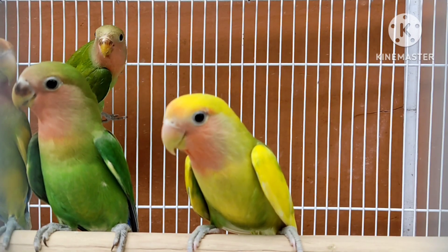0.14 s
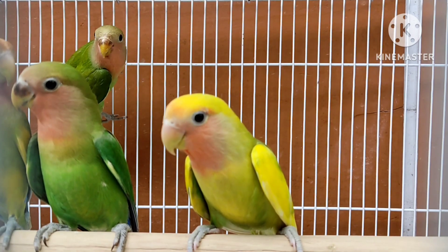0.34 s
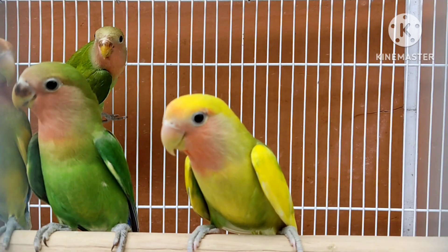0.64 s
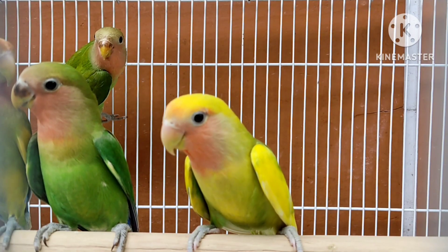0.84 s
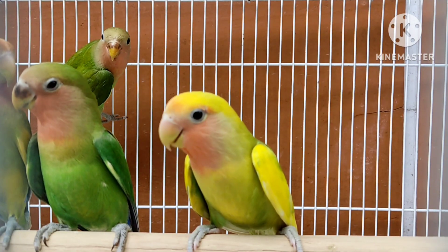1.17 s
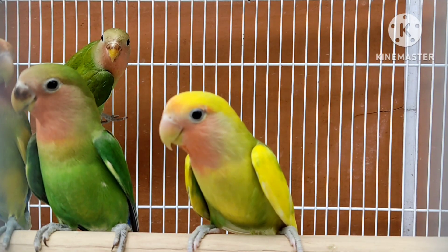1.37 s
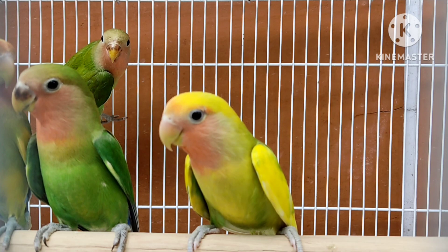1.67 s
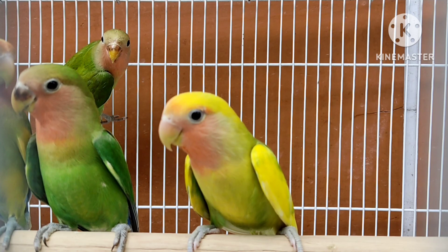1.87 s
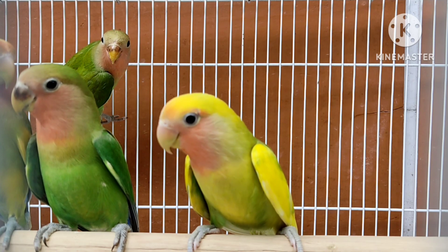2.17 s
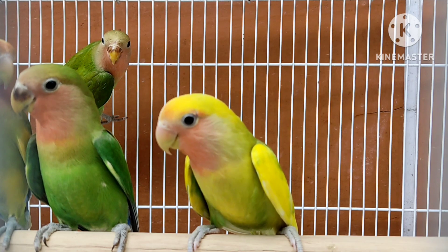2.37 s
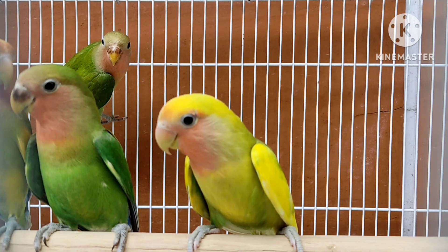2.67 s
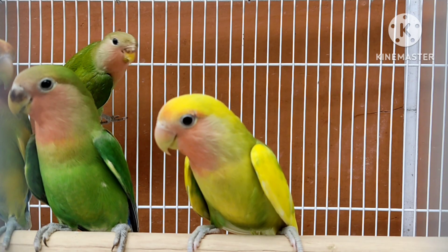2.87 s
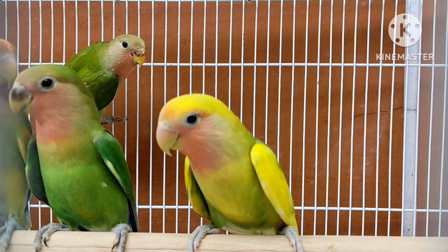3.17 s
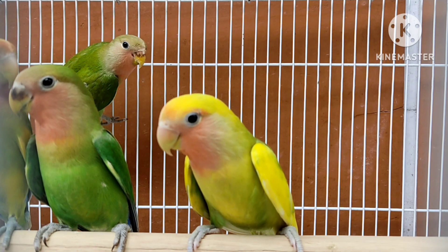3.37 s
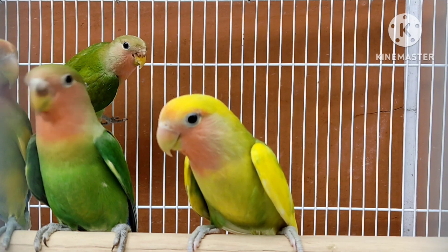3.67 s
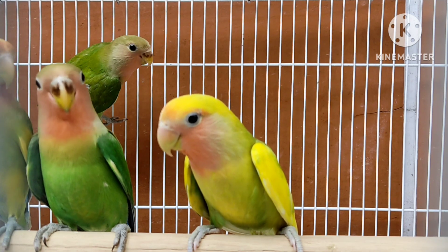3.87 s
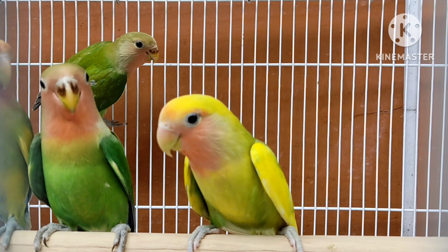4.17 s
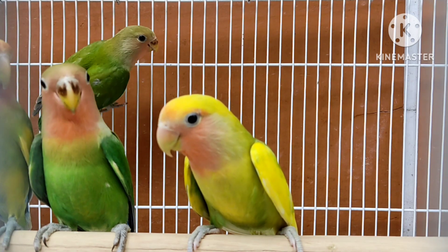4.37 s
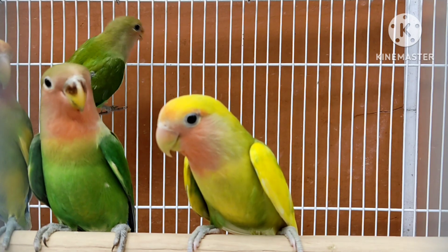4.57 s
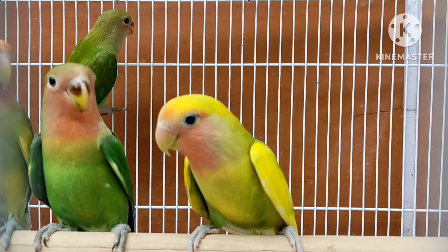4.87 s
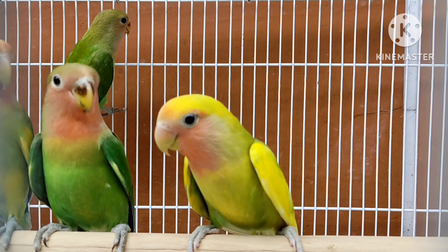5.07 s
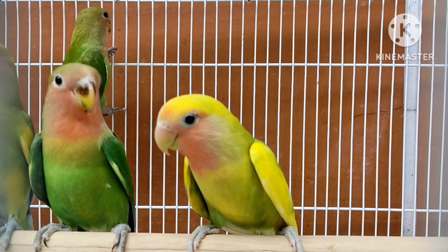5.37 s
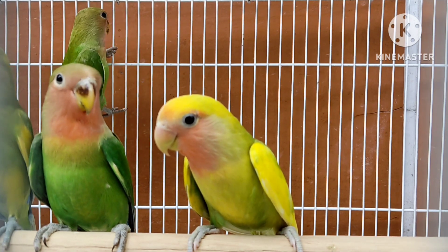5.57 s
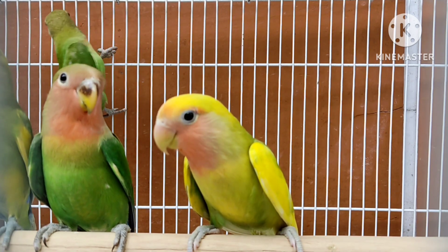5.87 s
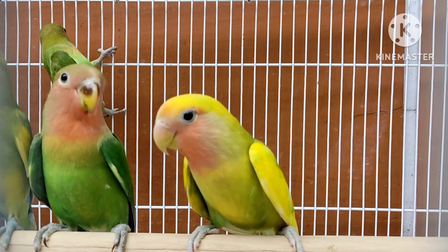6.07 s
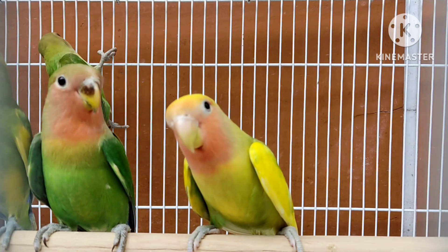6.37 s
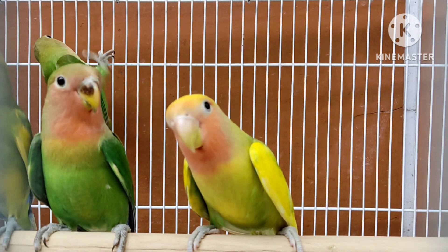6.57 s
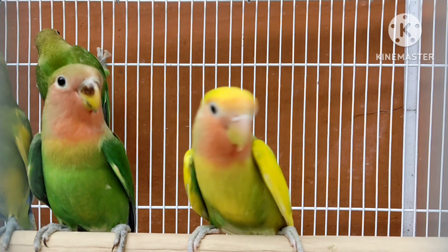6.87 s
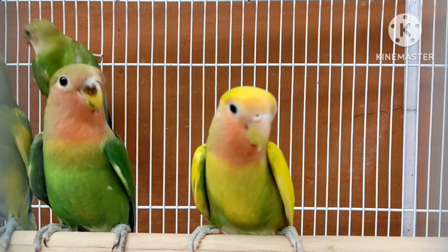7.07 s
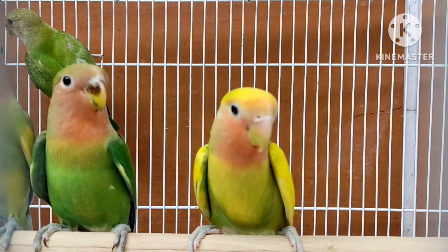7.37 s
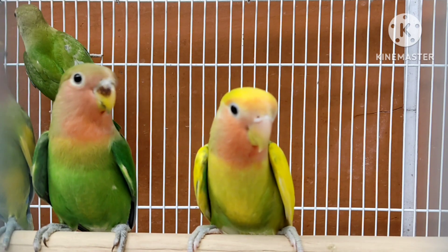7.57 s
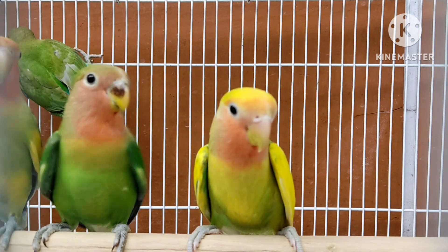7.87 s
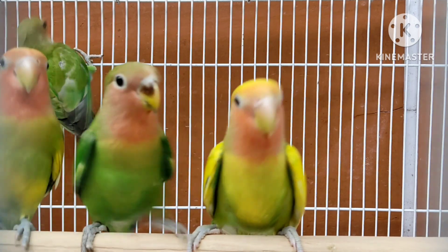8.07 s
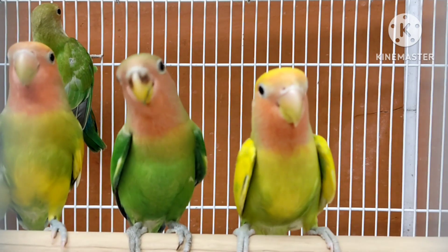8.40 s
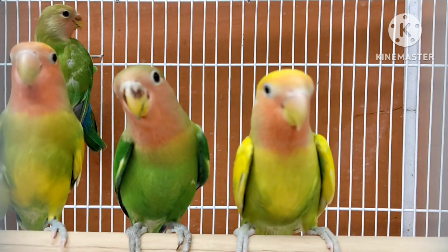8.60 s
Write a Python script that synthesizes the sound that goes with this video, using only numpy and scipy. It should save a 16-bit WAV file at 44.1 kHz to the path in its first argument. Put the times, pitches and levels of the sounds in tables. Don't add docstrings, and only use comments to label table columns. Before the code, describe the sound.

Two very short screams open, then bright, harsh-ending chirps come singly or in pairs, loud and distorting at close range. Between them lie low room hum, faint reverberant bird calls, muted perch knocks and tiny wire ticks. A neighbour chatters quietly midway. Late, a high motor whine climbs through airy hiss; a soft landing thud leads to clattering wing flaps and puffs of air, then a rapid trio of rasping shrieks.

```python
import sys
import numpy as np
from scipy import signal
from scipy.fft import rfft, irfft
from scipy.io import wavfile
from scipy.ndimage import uniform_filter1d

SR = 44100
rng = np.random.default_rng(int(sys.argv[2]) if len(sys.argv) > 2 else 0)


def dump(signal):
    limited = np.clip(np.atleast_2d(signal).T, -1, 1)
    pcm = np.round(limited * 32767).astype(np.int16)
    wavfile.write(sys.argv[1], SR, pcm)


def invert_db(x):
    u = np.asarray(x, float) / 20
    return 10 ** u


N = 385434


def unit(x):
    return x / np.sqrt(np.mean(x ** 2, axis=-1, keepdims=True))


def on_log_axis(table, hz):
    f, value = np.transpose(table)
    return np.interp(np.log(np.maximum(hz, 1)), np.log(f), value)


def coloured(table, size):
    gain = invert_db(on_log_axis(table, np.fft.rfftfreq(size, 1 / SR)))
    return irfft(rfft(rng.standard_normal(size)) * gain, size)


def walk(rate, size):
    k = max(int(SR / rate), 1)
    smooth = uniform_filter1d(uniform_filter1d(rng.standard_normal(size + 9000), k), k)
    return unit(smooth)[:size]


def add(track, s, sound):
    i = int(s * SR)
    track[i:i + len(sound)] += sound[:N - i]


def voice(notes, throat, wobble, flutter_db, rate, rasp_db, beak_db, edge, count, arch=0):
    out = np.zeros(N)
    clock = np.arange(SR // 4) / SR
    k = np.arange(1, count + 1)[:, None]
    for s, length, from_hz, to_hz, db, beak_hz in notes:
        shake, throb = walk(rate, len(clock)), walk(rate, len(clock))
        air = np.array([walk(1700, len(clock)) for _ in k])
        start = 2 * np.pi * rng.random((count, 1))
        size = int((length + edge) * SR)
        t = clock[:size]
        part = t / t[-1]
        hz = to_hz + (from_hz - to_hz) * (1 - part) ** 1.3
        hz = hz * (1 + wobble * shake[:size] + arch * np.sin(np.pi * part))
        off_beak = (k * np.mean(hz) - beak_hz) / (.12 * beak_hz)
        gain = on_log_axis(throat, k * hz) + beak_db / (1 + off_beak ** 2)
        strength = invert_db(gain) * (k * hz < .4 * SR) * (1 + invert_db(rasp_db) * air[:, :size])
        tone = np.sum(strength * np.sin(2 * np.pi * k * np.cumsum(hz) / SR + start), axis=0)
        shape = np.clip(np.minimum(t, t[-1] - t) / edge, 0, 1)
        db = db + 22 * np.log2(from_hz / to_hz).clip(-.4, 0) * (1 - part) ** 2
        add(out, s - edge / 2, invert_db(db + flutter_db * throb[:size]) * shape * unit(tone))
    return out


def beak_on_overtone(notes, near_hz):
    mid = [(row[2] + row[3]) / 2 for row in notes]
    return [(*row, hz * max(round(near_hz / hz), 1)) for row, hz in zip(notes, mid)]


# f/Hz, level/dB
THROAT_RESPONSE = [(710, -77.5), (1200, -21), (1910, -20.5), (2890, -9), (3950, -17.5), (4600, -11.5),
                   (5780, -15), (6510, -6.5), (8500, -16.5), (16000, -28)]
# t/s, length/s, f reached/Hz, level/dB
RISING_GLIDES = [(.012, 0.016, 2063, -9.5), (0.114, 0.0075, 2233, -9.5), (1.208, .024, 2216, 2),
                 (3.181, .018, 1937, -5), (4.784, 0.015, 1982, -10), (4.916, .014, 2230, -8),
                 (6.21, 0.02, 1960, -2)]
# t/s, length/s, f from/Hz, f to/Hz, level/dB
WIDE_NOTES = [(3.197, .028, 1930, 2070, -8.5)]
# t/s, length/s, f from/Hz, f to/Hz, level/dB
HELD_NOTES = [(1.316, 0.0085, 1818, 1968, -11), (4.797, .016, 2165, 2214, -1),
              (4.813, 0.022, 2260, 2410, -1.5), (4.926, 0.016, 2420, 2422, -8),
              (6.248, .018, 1982, 1978, -7)]
# t/s, length/s, f from/Hz, f to/Hz, level/dB
HALF_SHUT_NOTES = [(1.233, 0.026, 2486, 2548, -6), (1.325, 0.045, 2445, 2653, -11.5)]
# t/s, length/s, f from/Hz, f to/Hz, level/dB
HARSH_NOTES = [(1.259, 0.028, 7240, 6536, -2), (1.366, 0.023, 7120, 6920, -3),
               (3.222, 0.026, 2080, 2122, -6.5), (4.831, .008, 2536, 2666, -10),
               (4.840, 0.017, 6790, 6750, -6), (4.941, 0.0093, 2438, 2902, -13),
               (4.949, 0.014, 6900, 6530, -7.5), (6.235, 0.01, 2120, 1990, -7),
               (6.274, 0.016, 2022, 1943, -14), (6.264, 0.01, 4247, 5000, -9.5)]
# t/s, length/s, f from/Hz, f to/Hz, level/dB
HOARSE_NOTES = [(8.387, .007, 4407, 4643, -8), (8.392, 0.0044, 4790, 6700, -3),
                (8.395, .006, 6850, 6735, -1.5), (8.401, .008, 5460, 4140, -20.5),
                (8.465, .011, 7650, 7240, -10), (8.476, 0.011, 4500, 4484, -16),
                (8.482, 0.011, 6400, 6120, -11), (8.564, .008, 6900, 6530, -8),
                (8.572, .012, 5966, 5940, -8)]
# t/s, length/s, f from/Hz, f to/Hz, level/dB
WIDE_SCREAMS = [
    (.028, .008, 4237, 5070, -8.5),
    (.036, .022, 4950, 4770, -9),
    (.129, 0.0081, 4130, 5050, -5.5),
    (.141, 0.02, 5040, 4646, -11),
    (8.374, .016, 1476, 3120, -5.5),
    (8.453, 0.01, 1736, 2950, -8),
    (8.464, .012, 4344, 4522, -9.5),
    (8.538, .013, 1615, 3120, -11.5),
    (8.549, .017, 4156, 4304, -8),
]
# t/s, length/s, f from/Hz, f to/Hz, level/dB
SECOND_SYRINX = [
    (.016, 0.0094, 3000, 3797, -15),
    (.122, 0.012, 2600, 3913, -16),
    (1.262, 0.012, 2343, 2230, -22.5),
]


def parrots():
    rises = [(s, length, .75 * hz, hz, db) for s, length, hz, db in RISING_GLIDES]
    wide_hz, open_hz = 8700, 6800
    clear = beak_on_overtone(rises, 7300)
    clear += beak_on_overtone(WIDE_NOTES, wide_hz)
    clear += beak_on_overtone(HELD_NOTES, open_hz)
    clear += beak_on_overtone(HALF_SHUT_NOTES, 5000)
    harsh = beak_on_overtone(HARSH_NOTES, open_hz)
    hoarse = beak_on_overtone(HOARSE_NOTES, open_hz)
    hoarse += beak_on_overtone(WIDE_SCREAMS, wide_hz)
    hoarse += beak_on_overtone(SECOND_SYRINX, 2800)
    near = voice(clear, THROAT_RESPONSE, wobble=.011, flutter_db=3, rate=300, rasp_db=-12,
                 beak_db=11, edge=.003, count=9)
    near += voice(harsh, THROAT_RESPONSE, wobble=.021, flutter_db=2.5, rate=450, rasp_db=-10,
                  beak_db=7, edge=.004, count=7)
    near += voice(hoarse, THROAT_RESPONSE, wobble=.022, flutter_db=2.5, rate=500, rasp_db=-8,
                  beak_db=6, edge=.003, count=7)
    return near


# t/s, length/s, f from/Hz, f to/Hz,
# level/dB
NEIGHBOUR_NOTES = [(.002, 0.01, 4855, 4640, -30.5), (4.537, 0.013, 1730, 2050, -32),
                   (4.547, 0.019, 6270, 6480, -34.5), (4.577, .018, 6520, 6570, -49),
                   (4.620, 0.012, 2330, 2410, -37), (4.632, .0083, 4120, 4470, -31),
                   (4.642, .018, 5135, 4904, -35.5), (4.722, 0.023, 1793, 1947, -35),
                   (4.737, .016, 4142, 4536, -28), (4.745, 0.029, 5150, 4836, -35)]


def neighbour():
    return voice(beak_on_overtone(NEIGHBOUR_NOTES, 6800), THROAT_RESPONSE, wobble=.022, flutter_db=9,
                 rate=490, rasp_db=-9, beak_db=11.5, edge=.004, count=7)


# t/s, length/s, left level/dB, right level/dB, rattle level/dB
DIAPHRAGM_SHIFTS = [(0.024, 0.038, -39.5, -32, -0.5), (0.112, 0.058, -28.5, -32, 0),
                    (1.221, 0.087, -24.5, -12.5, -6), (1.324, 0.093, -28.5, -9, -16.5),
                    (3.186, 0.084, -24, -10.5, -7.5), (4.794, 0.085, -18, -21.5, -7.5),
                    (4.923, 0.037, -33, -18, -11), (6.217, 0.089, -31.5, -26.5, -9.5),
                    (8.375, .04, -23, -34.5, -0.5), (8.46, 0.036, -21.5, -34.5, 0),
                    (8.528, 0.066, -18.5, -31, 0.5)]


def overload():
    out = np.zeros((2, N))
    rattle = unit(coloured([(30, -11.5), (80, -9.5), (200, -4.5), (330, -5), (700, -10.5),
                            (2500, -15.5), (5000, -34.5)], N))
    for s, length, left_db, right_db, rattle_db in DIAPHRAGM_SHIFTS:
        part = np.linspace(0, 1, int(length * SR))
        creep = np.sin(np.pi * part ** 1.41) ** 2
        push = creep * (invert_db(rattle_db) * creep * rattle[int(s * SR):][:len(part)] - 1)
        add(out[0], s, invert_db(left_db) * push)
        add(out[1], s, invert_db(right_db) * push)
    return out


def band(x, hz, width):
    return signal.lfilter(*signal.iirpeak(min(hz, .45 * SR), hz / width, SR), x)


def hits(events, width, pure, crack_db, rise):
    out = np.zeros(N)
    t = np.arange(SR // 3) / SR
    for s, db, hz, t60 in events:
        noise = rng.standard_normal((2, len(t)))
        scrape = band(band(noise[0], hz, width * hz), hz, width * hz)
        body = unit(scrape) + pure * np.sin(2 * np.pi * hz * t)
        crack = invert_db(crack_db) * noise[1] * invert_db(-60 * t / (.3 * t60))
        ring = body * invert_db(-60 * t / t60) + crack
        add(out, s, .29 * invert_db(db) * np.clip(t / rise, 0, 1) * ring)
    return out


# t/s, peak level/dB
CLAW_TICKS = [(4.3133, -29.5), (4.4739, -25), (5.2965, -40), (6.183, -33.5), (7.291, -30.5)]
# t/s, peak level/dB
WING_FLAPS = [
    (8.1304, -12),
    (8.1422, -12),
    (8.1953, -9),
    (8.2199, -30),
    (8.2515, -11.5),
    (8.265, -24),
    (8.308, 2.5),
    (8.3254, -40),
]


def cage_wires():
    ticks = [(s, db, 6900, .0217) for s, db in CLAW_TICKS]  # f/Hz, t60/s
    flaps = [(s, db, 7550, .018) for s, db in WING_FLAPS]
    struck = hits(ticks, width=.9, pure=0, crack_db=-4, rise=.0004)
    return struck + hits(flaps, width=.55, pure=0, crack_db=-5, rise=.0006)


# t/s, level/dB
WING_GUSTS = [
    (8.1, -67.5),
    (8.142, -17),
    (8.178, -36.5),
    (8.262, -26),
    (8.284, -44.5),
    (8.32, -26.5),
    (8.356, -57),
    (8.4, -36),
]


def wings():
    s, db = np.transpose(WING_GUSTS)
    rumble = [(25, 1), (70, -12.5), (250, -8.5), (1500, -22), (5000, -33.5)]
    puffs = [unit(coloured(rumble, N)) * invert_db(3.4 * walk(65, N)) for _ in range(2)]
    return invert_db(np.interp(np.arange(N) / SR, s, db, left=-120, right=-120) - 2.5) * np.array(puffs)


# t/s, peak level/dB, f/Hz, t60/s
PERCH_KNOCKS = [(0.28, -48.5, 151.7, 0.95), (0.731, -51.5, 172.5, 0.2), (0.896, -44.5, 766, 0.23),
                (2.554, -45, 821, 0.12), (4.314, -43.5, 885, 0.035), (4.659, -51, 729, 0.22),
                (5.02, -46, 181.7, 0.031), (5.84, -44, 777, 0.099), (6.507, -37, 930, 0.094),
                (6.815, -36.5, 853, 0.17), (7.067, -27, 1185, 0.017), (7.14, -48, 1240, 0.12),
                (7.199, -41, 1170, 0.076)]
# t/s, peak level/dB, f/Hz, t60/s
LANDING_THUDS = [
    (7.989, -30.5, 235, 0.067),
    (8.049, -56, 203, 0.17),
]


def perches():
    knocks = hits(PERCH_KNOCKS, width=.4, pure=1, crack_db=-12.5, rise=.001)
    return knocks + 2.3 * hits(LANDING_THUDS, width=.26, pure=.51, crack_db=-24, rise=.0012)


# f/Hz, level/dB
PEEP_RESPONSE = [(1500, -3), (2500, 0), (3600, -2), (4400, -15), (6000, -16), (9000, -18), (12000, -40)]
# t/s, length/s, f from/Hz, f to/Hz, level/dB
FAR_PEEPS = [(0.736, .0067, 2520, 2174, -71.5), (2.128, 0.068, 4295, 3100, -58.5),
             (3.053, 0.022, 3195, 2765, -65.5), (3.302, 0.11, 3320, 2303, -61.5),
             (3.627, 0.055, 2420, 3145, -57.5), (3.686, 0.06, 3140, 1905, -60.5),
             (3.97, 0.12, 3590, 1730, -59.5), (4.107, 0.069, 3606, 1693, -59.5),
             (4.317, 0.044, 3837, 2366, -52), (4.44, 0.12, 3295, 2465, -60.5),
             (5.167, 0.073, 4320, 4025, -56), (5.212, 0.035, 3550, 1860, -60.5),
             (5.681, .13, 3320, 2516, -56.5), (6.017, 0.1, 3220, 2690, -57.5),
             (6.363, 0.086, 3250, 2496, -57.5)]
# t/s, length/s, f from/Hz, f to/Hz, level/dB
FAR_SQUEAKS = [
    (.335, 0.023, 2950, 3466, -47),
    (.39, 0.04, 3090, 3760, -58.5),
    (2.15, 0.052, 3690, 3293, -69),
    (2.305, 0.046, 2910, 2968, -67.5),
    (2.72, 0.065, 3910, 4210, -68.5),
]


def far_peeps():
    peeps = voice([(*row, 2950) for row in FAR_PEEPS], PEEP_RESPONSE, wobble=.016, flutter_db=3,
                  rate=200, rasp_db=-7, beak_db=3, edge=.012, count=3)
    squeaks = voice(beak_on_overtone(FAR_SQUEAKS, 6800), THROAT_RESPONSE, wobble=.022, flutter_db=4,
                    rate=150, rasp_db=-4, beak_db=5, edge=.0065, count=3)
    return peeps + squeaks


# f/Hz, level/dB
CROAK_RESPONSE = [(900, -26), (1700, -5), (2500, -1), (3500, -1), (5000, -5), (6200, -20), (9000, -19),
                  (12000, -40)]
# t/s, length/s, f/Hz, level/dB
FAR_CROAKS = [(0.506, 0.082, 575, -56), (0.813, .081, 493, -57.5), (2.433, 0.058, 472, -64.5),
              (2.817, 0.11, 559, -58), (3.403, .096, 493.5, -58), (4.051, 0.068, 591, -60),
              (5.704, 0.13, 583, -61.5)]


def far_croaks():
    notes = [(s, length, hz, hz, db, 4410) for s, length, hz, db in FAR_CROAKS]
    return voice(notes, CROAK_RESPONSE, wobble=.002, flutter_db=1.5, rate=40, rasp_db=-16, beak_db=4,
                 edge=.025, arch=.06, count=14)


# t/s, whine f/Hz, whine level/dB, fan hiss level/dB
MOTOR_SPEED = [
    (6.45, 4270, -48.5, -42.5),
    (6.808, 4906, -54.5, -55.5),
    (7.346, 5524, -54.5, -59),
    (7.926, 5695, -50.5, -56),
    (8.12, 5740, -52, -53),
]


def motor():
    s, *columns = np.transpose(MOTOR_SPEED)
    t = np.arange(N) / SR
    hz, whine_db, hiss_db = (np.interp(t, s, c) for c in columns)
    turn = 2 * np.pi * np.cumsum(hz * (1 + .0042 * walk(90, N))) / SR
    whine = invert_db(whine_db - 1 + 2.5 * walk(70, N)) * (np.sin(turn) + invert_db(-30) * np.sin(2 * turn))
    whine = whine * invert_db(-8 * (t - s[-1]).clip(0))
    fan = [(2000, -11.5), (5000, -9), (7300, -.5), (9300, -10.5), (10000, -18.5), (15000, -31)]
    hiss = np.array([unit(coloured(fan, N)) for _ in range(2)])
    hiss = invert_db(hiss_db + 9.5 + 2 * walk(27, N)) * hiss
    return np.clip((t - s[0]) / .72, 0, 1) * (whine + hiss)


# f/Hz, level per Hz/dB
HUM_SPECTRUM = [(12, -27), (20, 6.5), (151, -8.5), (263, -7), (357, -9.5), (398, -11.5), (1080, -14.5),
                (2040, -17), (2340, -18), (3180, -17.5), (5690, -25), (7510, -14), (15000, -58.5)]
# f/Hz, coherence (up to 1, negative counts as 0)
HUM_COHERENCE = [(60, 0), (130, 0.97), (290, 0.2), (640, 0.32), (1410, -0.13), (3100, 0), (6820, 0),
                 (15000, 0.18)]
# t/s, level/dB
HUM_SWELL = [(0, -57.5), (0.918, -60), (2.04, -59.5), (4.2, -60.5), (4.699, -55), (6.23, -60.5),
             (6.9, -55.5), (8.1, -65), (8.74, -55.5)]


def room_hum(shrieks):
    hz = np.fft.rfftfreq(N, 1 / SR)
    alike = np.clip(on_log_axis(HUM_COHERENCE, hz), 0, .98)
    mid = rfft(coloured(HUM_SPECTRUM, N)) * np.sqrt(1 + alike)
    side = rfft(coloured(HUM_SPECTRUM, N)) * np.sqrt(1 - alike)
    pair = np.array([mid + side, mid - side])
    hum = 0
    registers = [(0, 300, 2.4), (303.3, 1500, 1.3), (1504, 4500, 2), (4500, 6500, 3.5), (6500, 30000, 2.2)]
    for low_hz, high_hz, flicker_db in registers:
        inside = (hz >= low_hz) & (hz < high_hz)
        hum = hum + irfft(pair * inside, N) * invert_db(flicker_db * walk(5.9, N))
    fade = np.exp(-1 / (.071 * SR))
    stir = invert_db(-59.5) * signal.lfilter([1 - fade], [1, -fade], np.abs(shrieks)) * 10
    swell = invert_db(np.interp(np.arange(N) / SR, *np.transpose(HUM_SWELL)) + 4)
    return (swell + stir) * unit(hum)


def echoes(x, t60, wet_db, onset, damp):
    t = np.arange(SR) / SR
    noise = rng.standard_normal((2, SR))
    dull = signal.lfilter([.3], [1, -.7], noise)
    cloud = dull + (noise - dull) * invert_db(-damp * t)
    cloud = cloud * invert_db(-60 * t / t60) * np.clip(t / onset, 0, 1)
    cloud = cloud / np.sqrt(np.sum(cloud ** 2, axis=1, keepdims=True))
    return invert_db(wet_db) * signal.fftconvolve(x[None], cloud, axes=1)[:, :N]


# f/Hz, level/dB
CAPSULE_RESPONSE = [(1000, 0), (3300, -2), (5000, 0), (9500, 0), (11000, -5), (12600, 2.5), (14000, 1.5),
                    (15200, -11), (15900, -40)]
# f/Hz, left minus right level/dB
BODY_SHADOW = [(60, -19.5), (110, -5.5), (200, -7), (380, -11.5), (700, 0.5), (1290, -3), (2380, -12.5),
               (4400, -5.5), (8120, 2.5), (15000, 0)]


def capsules(x):
    hz = np.fft.rfftfreq(N, 1 / SR)
    db = np.outer([.5, -.5], on_log_axis(BODY_SHADOW, hz)) + on_log_axis(CAPSULE_RESPONSE, hz)
    return irfft(rfft(x) * invert_db(db), N)


def scene():
    near, aside, wires = parrots(), neighbour(), cage_wires()
    close = near + .8 * aside + 1.5 * wires
    direct = invert_db(-1.5) * np.array([np.roll(close, 9), close])
    cage = echoes(near + 1.5 * aside + .3 * wires, t60=.04, wet_db=-5, onset=.0015, damp=30)
    room = echoes(near + 3.5 * aside + .19 * wires, t60=.45, wet_db=-18.5, onset=.0031, damp=27)
    birds = capsules(direct + cage + room)
    croaks, knocks = far_croaks(), perches()
    distant = echoes(far_peeps() + .35 * croaks + .57 * knocks, t60=.7, wet_db=8.5, onset=.0016, damp=18)
    background = distant + 1.04 * croaks + 1.56 * knocks
    return birds + background + motor() + wings() + room_hum(near)


def top_cut(x):
    return signal.sosfilt(signal.butter(12, 15900, fs=SR, output="sos"), x)


def record(dry):
    loudness = np.sqrt(uniform_filter1d(dry ** 2, int(.004 * SR)).clip(1e-12))
    held = dry / (1 + (loudness / invert_db(-9.5)) ** 4) ** .2
    coupling = signal.butter(2, 3.2, "high", fs=SR, output="sos")
    coupled = signal.sosfilt(coupling, held + overload())
    rounded = coupled / (1 + (np.abs(coupled) / .72) ** 6) ** (1 / 6)
    return top_cut(rounded)


dry = scene()
out = record(dry)
dump(out)
```